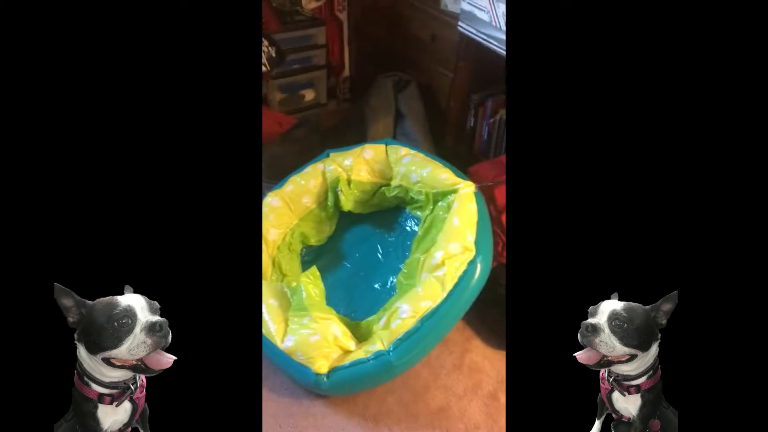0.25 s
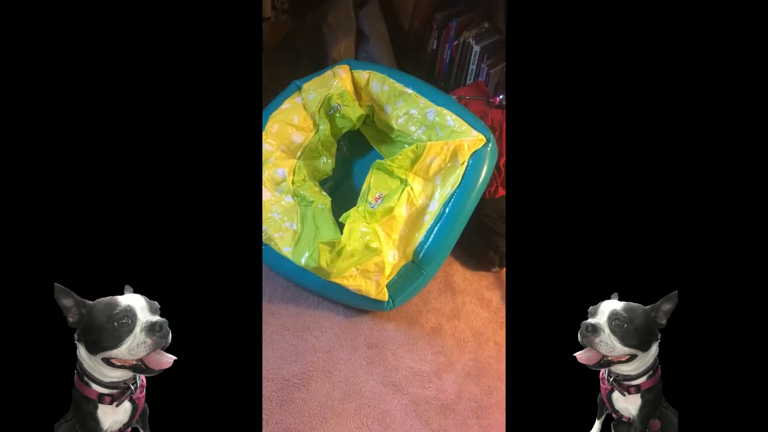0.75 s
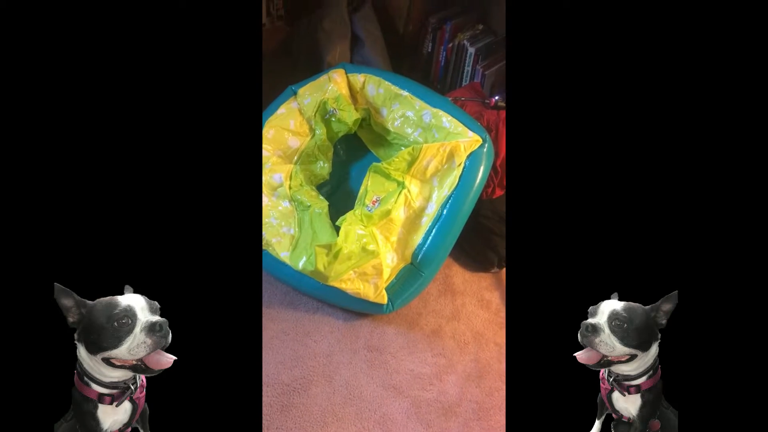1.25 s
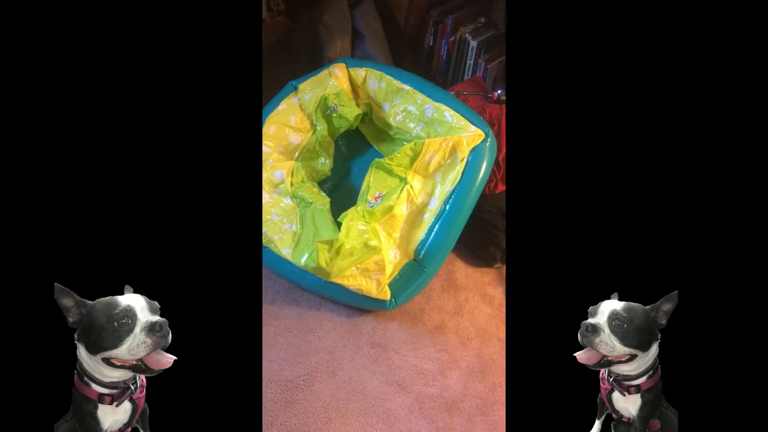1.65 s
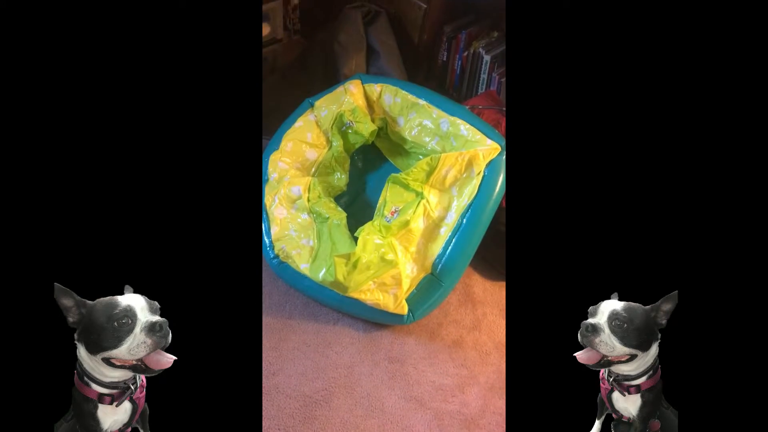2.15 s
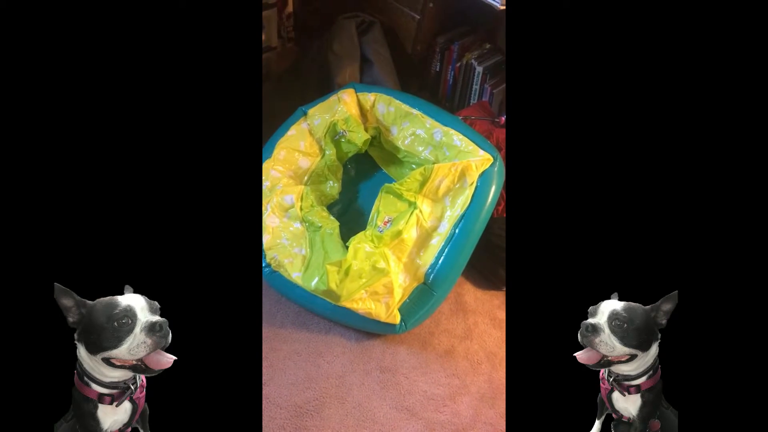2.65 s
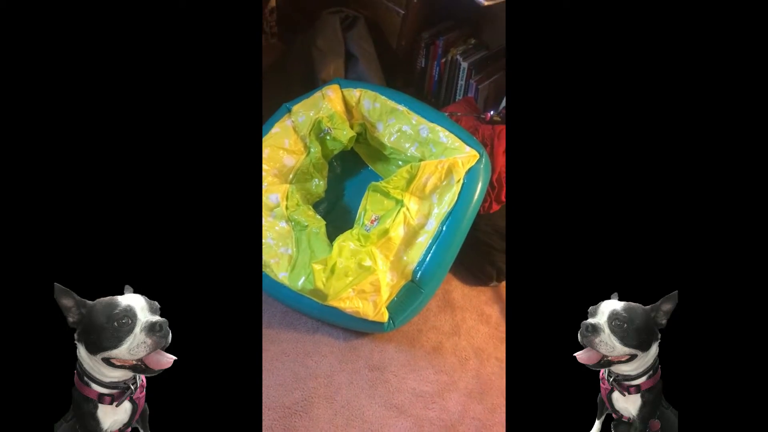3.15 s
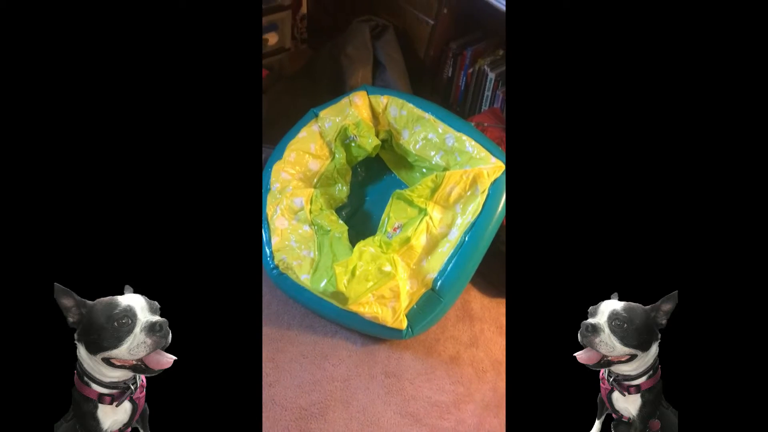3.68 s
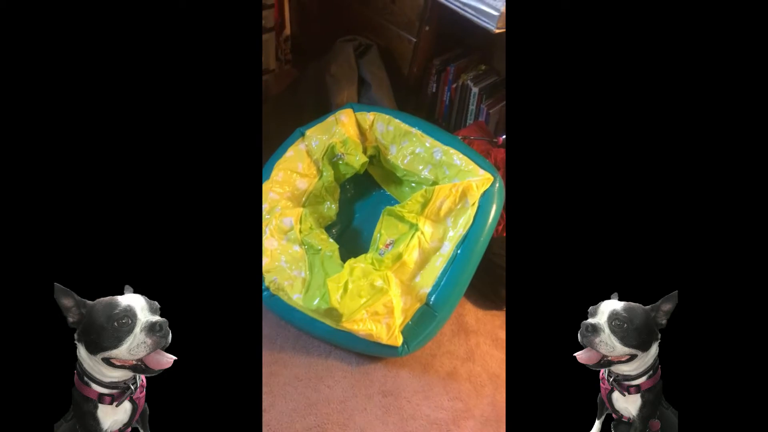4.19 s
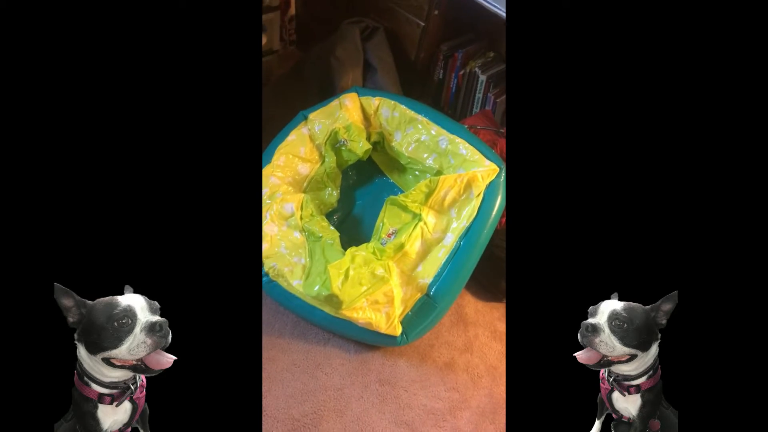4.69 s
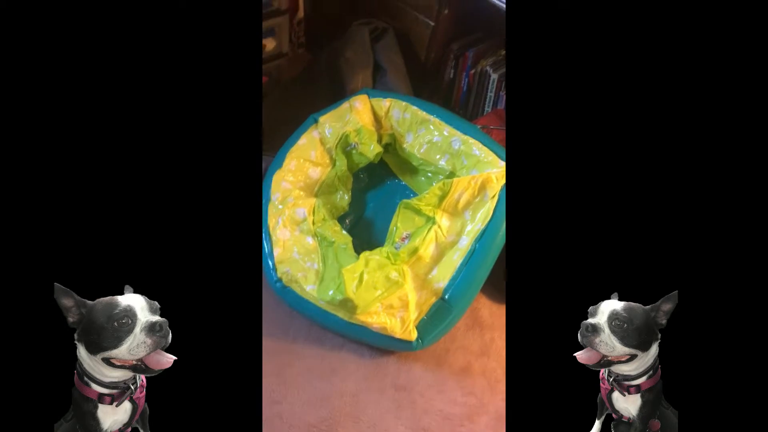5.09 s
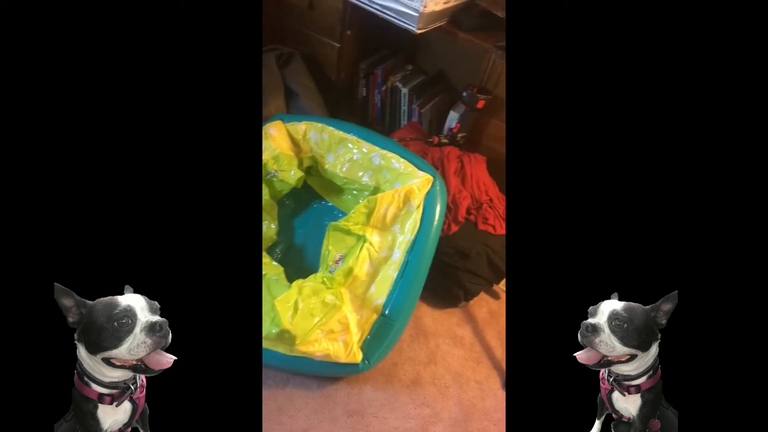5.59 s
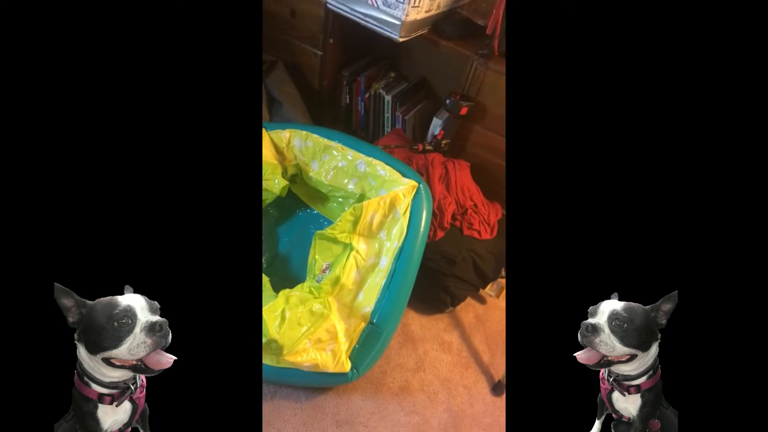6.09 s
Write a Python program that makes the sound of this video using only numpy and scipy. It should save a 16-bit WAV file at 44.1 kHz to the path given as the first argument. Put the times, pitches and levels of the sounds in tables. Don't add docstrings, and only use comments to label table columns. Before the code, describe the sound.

A small air pump rattles to a stop, a hard knock, brief silence, then a steady buzzing drone that cuts off and coasts to a stall.

```python
import sys
import numpy as np
from scipy import signal
from scipy.fft import rfft, irfft, next_fast_len
from scipy.io import wavfile
from scipy.ndimage import uniform_filter1d

SR = 44100
rng = np.random.default_rng(int(sys.argv[2]) if len(sys.argv) > 2 else 0)


def output_pcm(signal):
    pcm = np.clip(np.atleast_2d(signal).T, -1, 1) * 32767
    wavfile.write(sys.argv[1], SR, np.round(pcm).astype(np.int16))


def decibels_to_gain(level_db):
    exponent = np.asarray(level_db, float) / 20
    return 10 ** exponent


N = 279373

# time in seconds, crank rate in Hz.
CRANK_RATE = [(0.7, 52.97), (1.3, 52.93), (2.4, 52.95), (3.7, 52.95), (4.4, 53.09), (5.1, 53.1),
              (5.7, 53.03)]
# multiple of crank rate, level in dB.
STROKE_HARMONICS = [(6, -21), (7, -16), (8, -11.5), (9, -15), (10, -6), (11, -11), (12, -6.5), (13, -9),
                    (14, -5.5), (15, 1.5), (16, -0.5), (17, -2), (18, -9.5), (19, -2), (20, -2.5), (21, 1),
                    (22, 1), (23, 0), (24, -1.5), (25, -3), (26, -6), (27, -4), (28, -20), (29, -20),
                    (30, -5), (31, -18), (32, -8.5), (33, -46)]
# frequency in Hz, level in dB per Hz.
BODY_COLOUR = [(120, -53), (200, -18.5), (238, -22), (417, -16), (475, -6.5), (525, -10), (581, -16),
               (802, 2.5), (937, 1), (1190, 7.5), (1800, -22.5), (2340, -53), (3960, -120)]
# frequency in Hz, level in dB per Hz.
VALVE_COLOUR = [(880, -38), (1500, -1), (1640, -6), (1820, -5), (2130, -2.5), (2520, -8), (2890, -15.5),
                (3410, -14.5), (3910, -20), (5770, -26.5), (6370, -31.5), (8450, -33), (10400, -41.5),
                (13900, -43.5), (15500, -50)]
# frequency in Hz, width in Hz, level in dB per Hz.
SHELL_RINGS = [(2067.5, 63, -3.5), (3030, 26, -9), (3318, 79, -6.5), (5250, 87, -21.5)]
# power off in seconds, stall in seconds, level in dB, sag in dB per second.
COASTS = [
    (-.05, .27, -25, 38.5),
    (5.729, 6.042, -21, 45),
]
# time in seconds, gain in dB.
PUFFS = [
    (.003, 6.5),
    (.024, 2),
    (.05, 5.5),
    (.08, 7),
    (.112, 5),
    (.16, 6),
    (.226, 8.5),
    (5.914, 6),
    (5.988, 7),
    (6.05, -12),
]
# time in seconds, peak in dB.
LOOSE_STROKES = [
    (0, -23),
    (.012, -15.5),
    (.04, -19),
    (.071, -20.5),
    (.106, -17),
    (.15, -17),
    (.205, -23),
    (.255, -31.5),
]
# ratio to the stroke pitch, level in dB.
CASING_OVERTONES = [(1.76, -22), (2.011, -6.5), (2.22, -18), (2.9, -24), (3.28, -22), (3.9, -19),
                    (4.1, -26), (4.9, -25)]
# frequency in Hz, width in Hz, level in dB.
CASING_RINGS = [(582, 68, -11.5), (1002, 32, -7), (1173, 120, -2.5), (1590, 14, -23), (1920, 53, -15),
                (2350, 120, -20)]
# start in seconds, peak in dB, pitch in Hz.
THUMPS = [(0.221, -30, 58), (0.319, -29, 43.7), (0.373, -27, 75), (0.448, -22, 63), (0.6, -44, 72),
          (0.64, -35, 92), (1.139, -39.5, 89), (1.458, -41, 56.5), (1.816, -32.5, 100), (1.901, -25.5, 59),
          (2.079, -22.5, 65), (2.188, -36, 83), (2.29, -35, 46), (2.932, -35, 75.03), (3.474, -16.5, 66.5),
          (3.539, -47, 59.54), (3.643, -20, 70.4), (3.688, -36, 67), (3.765, -32, 53), (3.938, -26, 52),
          (4.242, -29, 75.5), (5.098, -31, 47.3), (5.291, -26, 47.4), (5.599, -24, 58), (5.832, -32, 49.5),
          (5.954, -24.5, 49.5), (6.007, -29, 51), (6.07, -31, 52), (6.158, -39, 70.4), (6.272, -40, 52)]
# start in seconds, peak in dB, pitch in Hz, t60 in seconds.
KNOCK = [
    (.447, -33, 300, 0.049),
    (.4695, -16, 194, 0.028),
    (.4735, -12, 300, 0.014),
    (.4776, 7, 251, 0.022),
    (.4922, -4, 396, 0.038),
    (.504, -8, 278, 0.024),
]
# start in seconds, peak in dB, final pitch in Hz, t60 in seconds.
KNOCK_PUSH = [
    (.481, 5.5, 58.1, 0.093),
    (.508, -6, 61.4, 0.06),
]
# start in seconds, peak in dB, pitch in Hz, t60 in seconds.
TICKS = [(.4775, -11, 1720, 0.0085), (.4775, -22.5, 3030, 0.01), (.4775, -37, 6500, 0.003),
         (.4775, -33, 9000, 0.003), (.4775, -37, 12000, 0.003), (.493, -44, 1870, 0.014),
         (.502, -47, 1600, .02), (.55, -37, 500, .03), (.608, -34, 550, .02), (.608, -47, 1420, 0.014),
         (.638, -39, 1450, 0.0091), (1.25, -23.5, 250, 0.051), (1.48, -26, 282, 0.037),
         (1.82, -27, 265, 0.03), (2.55, -29, 239, 0.059), (3.617, -14, 324, 0.02), (3.94, -28, 264, .04),
         (4.28, -27, 260, 0.034), (5.337, -18, 1100, 0.025), (5.469, -4, 1110, 0.011),
         (5.46, -30, 260, 0.036), (6.07, -36, 960, 0.11), (6.107, -31.5, 1470, .025),
         (6.107, -53, 2550, 0.013), (6.2, -43, 1200, 0.02), (6.208, -44, 880, 0.03)]
# start in seconds, peak in dB, top frequency in Hz, t60 in seconds.
CLICKS = [
    (0.476, -22, 4500, 0.016),
    (.484, -34, 4000, .04),
    (.491, -34, 7000, 0.02),
    (.5, -35, 3000, .05),
    (.636, -40, 3000, .04),
    (5.468, -9.5, 3200, 0.058),
    (5.986, -28, 2980, .04),
    (5.996, -50, 9000, .02),
    (6.108, -49, 7500, 0.036),
    (6.325, -53, 12000, 0.05),
]
# frequency in Hz, level in dB per Hz.
RUMBLE_COLOUR = [(12, -42), (20, -39.5), (44, 6.5), (69, 8.5), (189, -9), (255, -18.5), (285, -28),
                 (362, -22), (400, -36), (520, -42.5), (880, -120)]
# frequency in Hz, level in dB per Hz.
ROOM_COLOUR = [(120, -37), (200, -5.5), (327, -4.5), (488, -12.5), (618, -1.5), (715, -4.5), (1330, -5),
               (4740, -38), (15500, -44)]
# frequency in Hz, level in dB per Hz.
MIC_HISS_COLOUR = [(500, -3), (5000, -2), (9000, -4), (15000, -13)]

SILENCE_S, RETURN_S = .6445, .691
FADE_DB, FADE_END_S = 9, 1.17
DUCK_DB, KNOCK_S = -7, .485
DRONE_DB, SETTLE_DB, SETTLE_S = -23, 2, 0.66
BRAKE_HZ_PER_S, UNLOAD_S, STALL_DB_PER_S = 65, 0.083, 200
RATTLE_DB, HISS_DB = -9.5, -28
RATTLE_SAG_DB_PER_S, HISS_SAG_DB_PER_S = 9, 18
PUFF_S, PUFF_BODY = .012, .4
TILT_DB_PER_OCTAVE, VALVE_RING_DB, SMEAR_RAD = (-1.9, -1.5), (0, 3.5), (2.35, 0.63)
RING_ORDER, RING_ORDERS_WIDE = (22, 20), 2.6
SCATTER_DB = (0.65, 1.4)
THROB = (0.089, 0.15)
CLATTER_MEMORY = .95
VALVE_AIR_HZ, VALVE_AIR_DB = (960, 1170), -12
HUM_HZ, HUM_DB = 250, -26
WHINE_HZ, WHINE_DB = 6005, -45
ROOM_T60_S, ROOM_WET_DB, ROOM_DB = .3, -8, -56.5
STROKE_HZ, STROKE_T60_S = 600, 0.14
RING_DB, RING_PEAK_S, RING_RISE_DB_PER_S, RING_STOP_S, RING_FALL_DB_PER_S = -37.5, 5.97, 31, 6.07, 330
RUMBLE_DB, RUMBLE_FADE, UNREST, UNREST_S = -42, 1.8, 0.54, 0.14
THUMP_T60_S = 0.092
MIC_LOW_HZ, MIC_HISS_DB = 40, -72.5


def level(x, db):
    return x * decibels_to_gain(db) / np.sqrt(np.mean(x ** 2))


def since(s):
    return np.maximum(np.arange(N) / SR - s, 0)


def colour(x, points):
    size = next_fast_len(N)
    hz, db = np.transpose(points)
    f = np.maximum(np.arange(size // 2 + 1) * SR / size, 1)
    gain = decibels_to_gain(np.interp(np.log(f), np.log(hz), db))
    return irfft(rfft(x, size) * gain, size)[:N]


def band(x, lo_hz, hi_hz):
    return signal.sosfiltfilt(signal.butter(2, [lo_hz, hi_hz], "band", fs=SR, output="sos"), x)


def resonance(x, hz, width_hz, db):
    return level(band(x, hz - width_hz / 2, hz + width_hz / 2), db)


def walk(turns_per_s):
    knots = rng.standard_normal(int(N / SR * turns_per_s) + 4)
    return np.interp(np.arange(N) * turns_per_s / SR, np.arange(len(knots)), knots) * 0.61


def blows(table, glide, attack):
    out = np.zeros(N)
    for s, db, hz, t60 in table:
        t = np.arange(int(1.2 * t60 * SR)) / SR
        turns = hz * (t + glide * t60 / 4 * (1 - np.exp(-4 * t / t60)))
        onset = (1 - np.exp(-t * hz / attack)) ** 2
        blow = decibels_to_gain(db) * np.sin(2 * np.pi * turns) * onset * 1000 ** (-t / t60)
        i = int(s * SR)
        out[i:i + len(t)] += blow[:N - i]
    return out


def fade():
    remaining = np.clip(1 - since(RETURN_S) / (FADE_END_S - RETURN_S), 0, 1)
    return -FADE_DB * remaining * (since(SILENCE_S) > 0)


def duck():
    return DUCK_DB * np.clip(since(KNOCK_S) / .03, 0, 1) * (since(RETURN_S) == 0)


def pump():
    hz, load, pressure, body_db, rattle_db, hiss_db = motor()
    turns = np.cumsum(hz) / SR
    tone = strokes(turns, load, pressure)
    air, valve = valve_air(turns, load, pressure)
    low = band(colour(air, BODY_COLOUR), 150, 1460)
    rattle = band(valve, 1350, 3244)
    hiss = band(valve, 4510, 22000)
    body = load * tone + (1.4 - (0.26 + 0.37 * pressure) * load) * level(low, -6.5)
    pulsed = band(air, *VALVE_AIR_HZ) * (1 + 0.7 * np.cos(2 * np.pi * turns))
    body += pressure ** 1.66 * level(pulsed, VALVE_AIR_DB)
    return decibels_to_gain(body_db) * body + decibels_to_gain(rattle_db) * level(rattle, 0) + decibels_to_gain(hiss_db + 2) * level(hiss, 0)


def motor():
    t = np.arange(N) / SR
    coast = 1 * (t > SILENCE_S)
    off, stall, coast_db, sag = np.array(COASTS)[coast].T
    idle = np.maximum(t - off, 0)
    drone_db = DRONE_DB - SETTLE_DB * np.exp(-since(RETURN_S) / SETTLE_S) + fade()
    base = np.where(idle > 0, coast_db, drone_db) - sag * idle - STALL_DB_PER_S * np.maximum(t - stall, 0)
    puffs = sum(db * np.exp(-((t - s) / PUFF_S) ** 2) for s, db in PUFFS)
    rattle = base + RATTLE_DB - RATTLE_SAG_DB_PER_S * idle + puffs
    hiss = base + HISS_DB - HISS_SAG_DB_PER_S * idle + puffs
    pressure = np.clip(since(RETURN_S) / (off - RETURN_S), 0, 1)
    hz = np.maximum(np.interp(t, *np.transpose(CRANK_RATE)) - BRAKE_HZ_PER_S * idle, 10)
    return hz, np.exp(-idle / UNLOAD_S), pressure, base + PUFF_BODY * puffs, rattle, hiss


def under_pressure(ends, pressure):
    start, end = ends
    return start + (end - start) * pressure ** 1.73


def strokes(turns, load, pressure):
    tilt = under_pressure(TILT_DB_PER_OCTAVE, pressure)
    valve_db = under_pressure(VALVE_RING_DB, pressure)
    smear = under_pressure(SMEAR_RAD, pressure)
    centre = under_pressure(RING_ORDER, pressure)
    tone = np.zeros(N)
    for k, db in STROKE_HARMONICS:
        wander = 1.5 * min(k / 24, 1) * walk(2)
        near = np.exp(-((k - centre) / RING_ORDERS_WIDE) ** 2)
        phase = (near * smear + (1 - near) * 1.73) * rng.standard_normal() + 0.12 * walk(2.86)
        gain = decibels_to_gain(db + tilt * np.log2(k / 18) + valve_db * near + wander)
        tone += gain * np.cos(2 * np.pi * k * turns + phase)
    count = int(turns[-1]) + 2
    hardness = np.interp(turns, np.arange(count), rng.standard_normal(count))
    tone = level(tone * decibels_to_gain(under_pressure(SCATTER_DB, pressure) * hardness), -1.86)
    t = np.arange(N) / SR
    hum = decibels_to_gain(HUM_DB) * np.sin(2 * np.pi * HUM_HZ * t)
    whine = decibels_to_gain(WHINE_DB) * np.sin(2 * np.pi * WHINE_HZ * t + .5 * walk(20))
    return tone + hum + whine


def valve_air(turns, load, pressure):
    throb = under_pressure(THROB, pressure)
    puff = 1 + throb * load * np.cos(2 * np.pi * turns) + 0.033 * load * np.cos(4 * np.pi * turns)
    repeat = np.clip(0.53 * load, 0, 1)
    air = repeat * clatter(turns) + np.sqrt(1 - repeat ** 2) * rng.standard_normal(N)
    air = walls(air * puff) * decibels_to_gain(0.28 * walk(9))
    shell = sum(resonance(air, hz, width, db + 10 * np.log10(width)) for hz, width, db in SHELL_RINGS)
    return air, level(colour(air, VALVE_COLOUR), 0) + level(shell, -21.0)


def clatter(turns):
    per_turn = 832
    fresh = rng.standard_normal((int(turns[-1]) + 2, per_turn))
    renewal = np.sqrt(1 - CLATTER_MEMORY ** 2)
    cycles = signal.lfilter([renewal], [1, -CLATTER_MEMORY], fresh, axis=0)
    return cycles.ravel()[(turns * per_turn).astype(int)]


def walls(x):
    t = np.arange(int(ROOM_T60_S * SR)) / SR
    tail = rng.standard_normal(len(t)) * 1000 ** (-t / ROOM_T60_S)
    tail /= np.sqrt(np.sum(tail ** 2))
    return x + signal.fftconvolve(x, tail)[:N] * decibels_to_gain(ROOM_WET_DB)


def casing():
    def ring(hz, attack):
        return blows([(s, db, hz, STROKE_T60_S) for s, db in LOOSE_STROKES], glide=.01, attack=attack)

    early = ring(STROKE_HZ, 1.25)
    early += sum(decibels_to_gain(db) * ring(ratio * STROKE_HZ, 4.2) for ratio, db in CASING_OVERTONES)
    rattling = rng.standard_normal(N) * decibels_to_gain(1.0 * walk(30))
    late = sum(resonance(rattling, hz, width, db) for hz, width, db in CASING_RINGS)
    t = np.arange(N) / SR
    swell = RING_DB - RING_RISE_DB_PER_S * np.abs(t - RING_PEAK_S) - RING_FALL_DB_PER_S * since(RING_STOP_S)
    last_power_off_s = COASTS[1][0]
    return early + late * decibels_to_gain(swell) * np.clip(since(last_power_off_s) / 0.047, 0, 1)


def handling():
    knock = blows(KNOCK, glide=0.21, attack=0.13) + blows(KNOCK_PUSH, glide=0.82, attack=0.071)
    thump_rows = [(s, db, hz, THUMP_T60_S) for s, db, hz in THUMPS]
    thumps = -blows(thump_rows, glide=0.48, attack=0.12) * decibels_to_gain(9.5)
    unrest = uniform_filter1d(uniform_filter1d(np.abs(thumps), int(UNREST_S * SR)), int(UNREST_S * SR))
    grip = decibels_to_gain(RUMBLE_DB + RUMBLE_FADE * fade() + duck() / 2) + UNREST * unrest
    rumble = level(colour(rng.standard_normal(N), RUMBLE_COLOUR), 0) * grip * decibels_to_gain(2.3 * walk(12))
    return rumble + thumps + knock + blows(TICKS, glide=0.021, attack=0.61)


def clicks():
    out, noise = np.zeros(N), rng.standard_normal(N)
    for s, db, top_hz, t60 in CLICKS:
        t = since(s)
        crack = level(band(band(noise, 150, top_hz), 100, top_hz), -7.0)
        out += decibels_to_gain(db) * crack * np.clip(t / 0.0016, 0, 1) * 1000 ** (-t / t60)
    return out


def room_tone():
    return level(colour(rng.standard_normal(N), ROOM_COLOUR), ROOM_DB) * decibels_to_gain(duck())


def mic_hiss():
    return level(colour(rng.standard_normal(N), MIC_HISS_COLOUR), MIC_HISS_DB)


def scene():
    return (pump() + casing() + handling() + clicks() + room_tone() + mic_hiss())[None]


def top_cut(x):
    return signal.sosfilt(signal.butter(12, 15630, fs=SR, output="sos"), x)


def record(dry):
    t = np.arange(N) / SR
    low_cut = signal.butter(1, MIC_LOW_HZ / 2, "high", fs=SR, output="sos")
    heard = signal.sosfilt(low_cut, dry) * decibels_to_gain(0.27)
    clipped = heard / (1 + np.abs(heard) ** 10) ** (1 / 10)
    gate = (t < SILENCE_S) + np.clip(since(RETURN_S) / .001, 0, 1)
    return top_cut(clipped * gate)


dry = scene()
out = record(dry)
output_pcm(out)
```